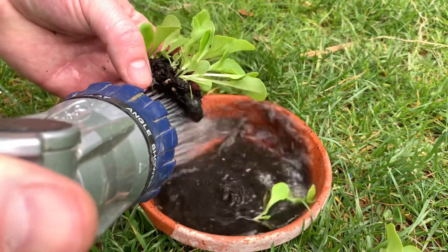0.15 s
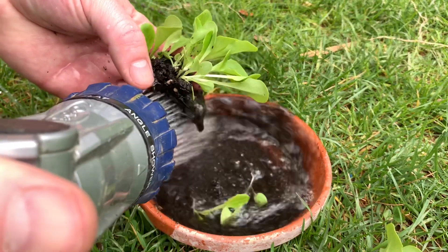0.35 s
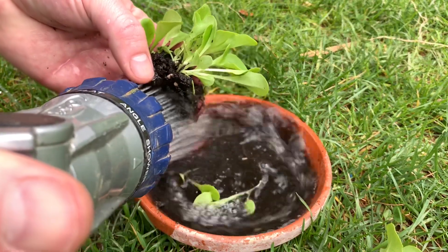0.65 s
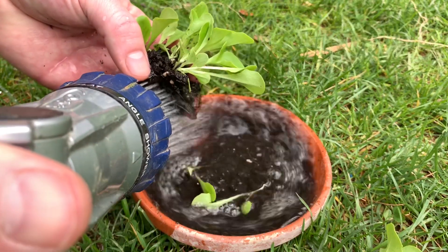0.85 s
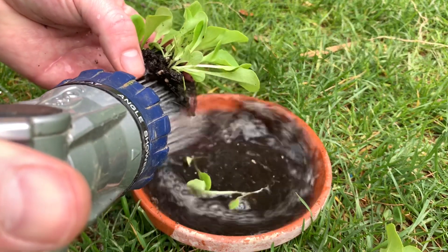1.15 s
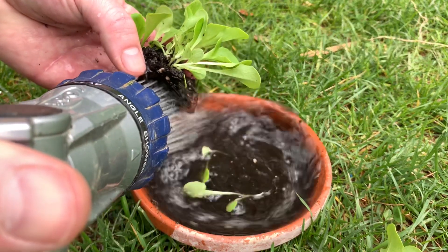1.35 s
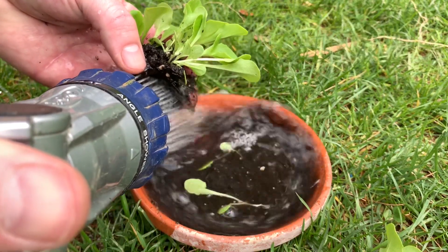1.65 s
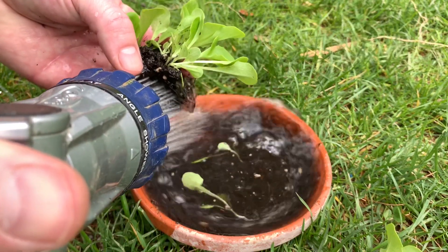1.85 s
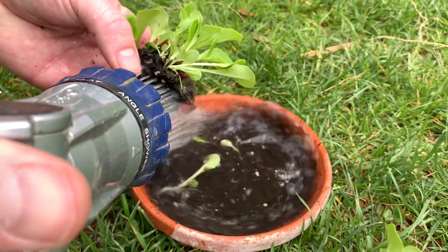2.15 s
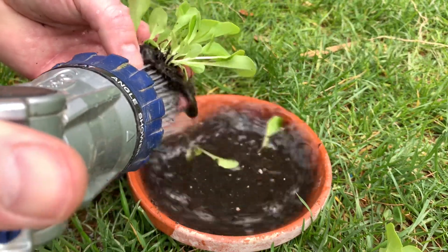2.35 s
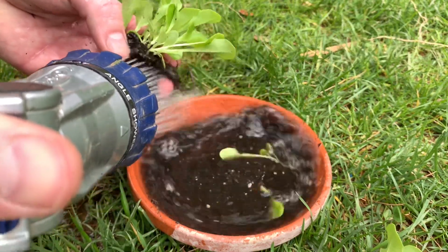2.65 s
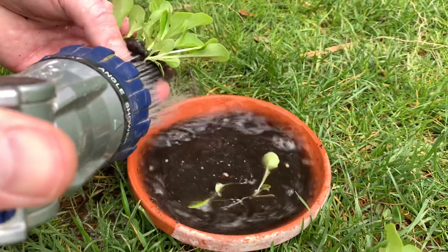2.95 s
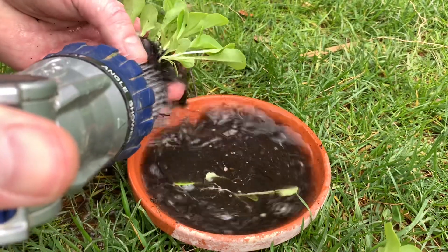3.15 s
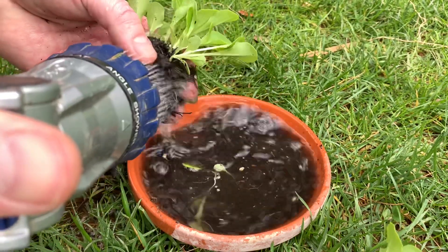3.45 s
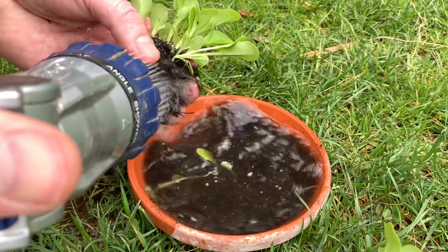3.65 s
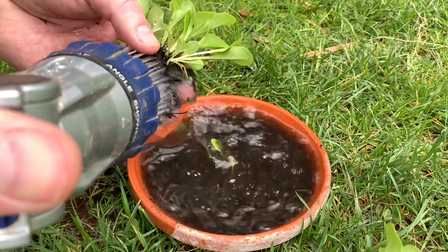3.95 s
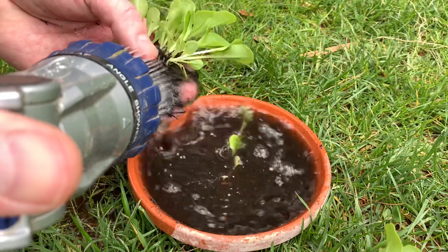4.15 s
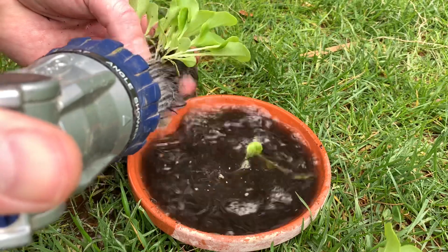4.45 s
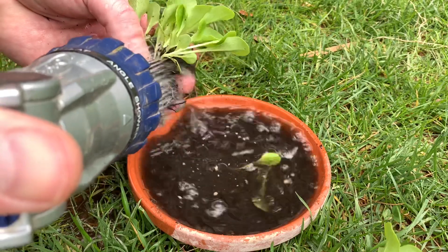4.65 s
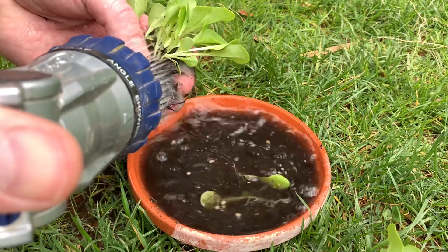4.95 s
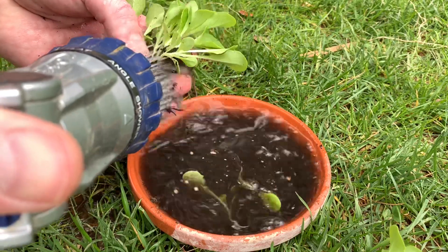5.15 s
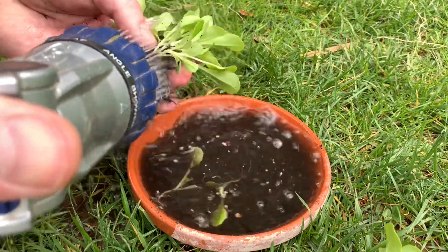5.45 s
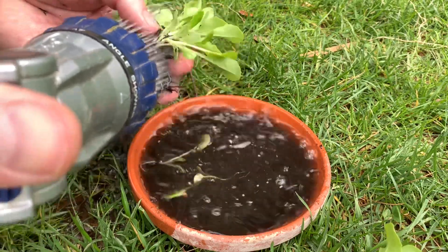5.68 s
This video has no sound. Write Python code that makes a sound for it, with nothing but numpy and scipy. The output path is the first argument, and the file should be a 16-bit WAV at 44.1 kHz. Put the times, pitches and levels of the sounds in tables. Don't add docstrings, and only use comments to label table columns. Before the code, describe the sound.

Close, airy water spray on plant roots with faint splashing and bubbling in a clay dish, under low, irregular wind buffeting outdoors.

```python
import sys
import numpy as np
from scipy import signal
from scipy.fft import rfft, irfft, next_fast_len
from scipy.io import wavfile
from scipy.ndimage import map_coordinates

SR = 44100
rng = np.random.default_rng(int(sys.argv[2]) if len(sys.argv) > 2 else 0)


def voltage_ratio(level):
    return 10 ** (np.asarray(level, float) / 20)


def materialize(psi):
    bounded = np.clip(np.atleast_2d(psi).T, -1, 1)
    quanta = np.round(bounded * 32767).astype(np.int16)
    wavfile.write(sys.argv[1], SR, quanta)


N = 256291

# time in seconds, jet hiss in dB, share of the jets caught by the roots in dB.
SPRAY = [(0, -32, 4.5), (.3, -30.5, 2.5), (.9, -30, 1), (1.8, -31.5, 2), (2.4, -31, 2.5), (3.35, -30, -1.5),
         (3.75, -29.5, -0.5), (4.3, -29.5, -1), (4.8, -29.5, -1), (5.4, -29.5, -0.5), (5.81, -30, -1)]
# frequency in Hz, density in dB per Hz, left-right difference in dB.
JET_COLOUR = [(3900, -30, -2), (4500, -15, -1.5), (5500, -16, -3), (6150, -12, -2), (6700, -4.5, -1.5),
              (7050, -6, 0), (7800, 0, 0), (9200, -4.5, 0), (10000, -4.5, 0), (11750, -8, 0),
              (12300, -2.5, 0), (13200, -8, 0), (14300, -9.5, 0), (15700, -13, 0)]
# centre in Hz, width in Hz, gain in dB.
JET_CAVITIES = [(8200, 196, -7), (8420, 230, 1.5), (9570, 720, -2), (14500, 320, -6)]
# frequency in Hz, lead of the right port in turns, likeness of the ports from 0 to 1.
PORT_PHASE = [(4000, .85, .3), (4700, 1.02, .35), (5500, 1.15, .25), (6100, 1.3, .55), (6600, 1.42, .7),
              (7200, 1.51, .95), (8200, 1.78, .75), (8900, 1.97, .98), (9750, 2.04, .98),
              (10400, 2.22, .75), (11000, 2.47, .99), (11900, 2.53, .99), (12600, 2.73, .75),
              (13250, 2.96, .99), (14800, 3.04, .98), (15250, 3.36, .82), (15700, 3.52, .93)]
# time in seconds, extra lag of the left port in samples.
AIM = [(0, 0.004), (1, -0.042), (2, -0.096), (3, -0.0031), (4, 0.019), (5, 0.052), (5.81, -0.018)]
# middle in seconds, half length in seconds, change on the roots in dB, change of fine scatter in dB.
TURNS = [
    (.62, .15, -0.1, -3),
    (1.267, 0.088, -2.5, -6.5),
    (3.54, 0.35, 1.1, -6.5),
    (4.305, 0.48, -0.4, -3.5),
]
# frequency in Hz, density in dB per Hz, left-right difference in dB,
# likeness of the ports from 0 to 1, phase lead of the right port in radians.
SPLASH_COLOUR = [(336, -22.5, 5.5, 0.5, 3.5), (610, -17.5, -2, 0.02, -1.5), (870, -20, 4, 0.39, 0.34),
                 (1600, -11.5, 3, .65, -3.7), (1800, -8, 5, .3, -4.5), (1990, -6.5, 1, .8, -3.2),
                 (2230, -4, .5, .84, -3.2), (2430, 0, 0, .7, -4.05), (2620, -3.5, -1.5, .35, -3.5),
                 (2760, -1.5, 3.5, .45, -3.8), (3120, -5.5, 0, .5, -3.3), (3400, -5.5, -.5, .77, -3.14),
                 (4050, -6, -2, .22, -3.3), (4760, -27.5, -18, 0.45, -2)]
# time in seconds, rumble in dB, flutter in dB.
WIND = [(0, -45.5, -53), (.5, -44.5, -45), (.9, -40.5, -50.5), (1.25, -45, -62), (1.55, -42, -49),
        (1.9, -41, -46.5), (2.2, -33, -50.5), (2.45, -42.5, -56), (2.75, -32.5, -39), (3.0, -35, -53),
        (3.3, -42, -47), (3.55, -34, -50), (3.85, -34.5, -44), (4.05, -40, -50), (4.3, -32, -50.5),
        (4.9, -37, -60), (5.45, -35, -43.5), (5.81, -37.5, -55)]
# frequency in Hz, density in dB per Hz.
RUMBLE_COLOUR = [(11, -45), (18, -22), (70, -1), (97, -2), (194, -15.5), (353, -29.5), (500, -36.5),
                 (650, -40.5), (1100, -120)]
# frequency in Hz, density in dB per Hz.
FLUTTER_COLOUR = [(70, -18), (150, 1.0), (250, -8.5), (400, -16.5), (650, -31.5)]
# time in seconds, level of the fundamental in dB.
MOTOR_LEVEL = [
    (0, -49),
    (1, -48.5),
    (2, -58),
    (3.5, -56.5),
    (5.81, -54),
]
# multiple of the fundamental, level in dB.
MOTOR_PARTIALS = [(1, -1.5), (2, -9), (3, -20)]
# start in seconds, peak in dB, pitch in Hz, level of the sharp edge in dB.
THUMPS = [(0.546, -29, 78.1, -62), (0.68, -28, 80, -27), (0.995, -29.5, 78, -12), (1.034, -24.5, 186, -16),
          (1.064, -24.5, 72, -11), (1.112, -17.5, 156, -18), (1.123, -18, 101, -14.5),
          (1.864, -29, 91.5, -15), (2.041, -16.5, 79, -15.5), (2.089, -26, 79, -10), (2.135, -34, 135, 0),
          (2.154, -22.5, 67.3, -18), (2.258, -25.5, 117, -17), (2.304, -28, 74, -18),
          (2.575, -21.5, 142, -21), (2.617, -19.5, 174, -23), (2.642, -14, 150, -20), (2.68, -26, 64.6, -9),
          (2.733, -19, 149, -35), (2.805, -22, 95, -18), (2.937, -19, 84, -37), (3.605, -20, 66.6, -26),
          (3.845, -25.5, 138, -30), (3.929, -35, 95.5, -4.5), (4.269, -26.5, 115, -16.5),
          (4.765, -16.5, 122, -10), (4.801, -28.5, 199, -9.5), (5.084, -25, 110, -34),
          (5.266, -25.5, 120, -31), (5.542, -22, 99, -17)]


def rms_one(x):
    return x / np.sqrt(np.mean(x ** 2) + 1e-20)


def in_time(rows):
    s, *columns = np.transpose(rows)
    return [np.interp(np.arange(N) / SR, s, column) for column in columns]


def in_pitch(rows, hz):
    at, *columns = np.transpose(rows)
    return [np.interp(np.log(hz), np.log(at), column) for column in columns]


def spectrum_hz():
    size = next_fast_len(N)
    return np.maximum(np.arange(size // 2 + 1) * SR / size, 1)


def drift(rate):
    r = np.exp(-80 * np.pi * rate / SR)
    noise = rng.standard_normal(N // 40 + 2002)
    slow = rms_one(signal.lfilter([1], [1, -2 * r, r * r], noise)[2000:])
    return np.interp(np.arange(N) / 40, np.arange(len(slow)), slow)


def drops(per_s, spread_db):
    sizes_db = spread_db * np.minimum(rng.exponential(1, (3, N)), 5)
    sizes = voltage_ratio(sizes_db) * rng.choice([-1, 1], (3, N))
    return sizes * (rng.random((3, N)) < per_s / SR)


def at_ports(showers, level_db, pan_db, alike, lead, edges, patchy_db, lower_db=0):
    size = next_fast_len(N)
    hz = np.arange(size // 2 + 1) * SR / size
    both, left, right = rfft(showers, size)
    alike = np.clip(alike, 0, 1)
    shared, apart = np.sqrt(alike) * both, np.sqrt(1 - alike)
    left = voltage_ratio(level_db + pan_db / 2) * (shared + apart * left)
    right = voltage_ratio(level_db - pan_db / 2) * (shared * np.exp(1j * lead) + apart * right)
    inside = (hz > edges[0]) & (hz < edges[-1])
    out, together = 0, drift(4.5) + drift(13)
    for k in range(len(edges)):
        share = np.interp(hz, edges, np.arange(len(edges)) == k) * inside
        flicker_db = patchy_db * (0.5 * together + 0.67 * drift(1.3) + drift(13.3))
        swell_db = lower_db * (k <= len(edges) // 2)
        band = irfft(np.array([left, right]) * share, size)[:, :N]
        out = out + voltage_ratio(flicker_db + swell_db) * band
    return rms_one(out)


def turned():
    middle, half, *changes_db = np.transpose(TURNS)
    bells = np.exp(-((np.arange(N) / SR - middle[:, None]) / half[:, None]) ** 2)
    return np.array(changes_db) @ bells


def moved(pair):
    lag = in_time(AIM)[0] + .06 * drift(6)
    return np.array([map_coordinates(port, [np.arange(N) - side * lag / 2], order=3, mode="nearest")
                     for port, side in zip(pair, [1, -1])])


def jets(hiss_db, roots_db):
    hz = spectrum_hz()
    level_db, pan_db = in_pitch(JET_COLOUR, hz)
    turns, alike = in_pitch(PORT_PHASE, hz)
    for centre, width, gain_db in JET_CAVITIES:
        level_db = level_db + gain_db / (1 + (2 * (hz - centre) / width) ** 2)
    mist = drops(26000, spread_db=2.5)
    stray_db = -1.5 + 0.34 * np.arange(N) / SR + .6 * turned()[0]
    mist[1:] *= voltage_ratio(stray_db + 0.61 * drift(8.2))
    hiss = at_ports(mist, level_db, pan_db, alike, 2 * np.pi * turns,
                    np.geomspace(3700, 15760, 8), patchy_db=0.71, lower_db=roots_db)
    return voltage_ratio(hiss_db + 5.5) * moved(hiss)


def bubbles(per_s, cycles):
    born = drops(per_s, spread_db=5.5)
    dealt = rng.integers(0, 10, N)
    out = 0
    for k, pitch_hz in enumerate(np.geomspace(900, 4200, 10)):
        r, w = voltage_ratio(-60 * pitch_hz / cycles / SR), 2 * np.pi * pitch_hz / SR
        struck = born * (dealt == k) + 1e-18
        ring = signal.lfilter([1, 0, -1], [1, -2 * r * np.cos(w), r * r], struck)
        out = out + np.sqrt(1 - r) * ring
    return rms_one(out)


def splash(splash_db, fine_db):
    level_db, pan_db, alike, lead = in_pitch(SPLASH_COLOUR, spectrum_hz())
    t = np.arange(N) / SR
    deep_db = 3 - 1.14 * t
    gurgle_db = -2.5 + 0.41 * t
    water = rms_one(drops(9000, spread_db=2.5)) + voltage_ratio(-16.5) * bubbles(500, cycles=25)
    deep = signal.sosfiltfilt(signal.butter(4, 2700, fs=SR, output="sos"), water[1:])
    fine = water[1:] - deep
    water[1:] = voltage_ratio(deep_db) * deep + voltage_ratio(0.6 * fine_db - 0.4) * fine
    patter = at_ports(water, level_db, pan_db, alike, lead,
                      np.geomspace(300, 5200, 8), patchy_db=.5, lower_db=gurgle_db)
    return voltage_ratio(splash_db + 6.0) * patter


def swells():
    rise_s, fall_s = 0.017, 0.06
    thumps_at, peaks_db = np.array(THUMPS)[:, :1], np.array(THUMPS)[:, 1]
    late = np.arange(N) / SR - thumps_at
    shape = np.exp(-2 * np.maximum(-late / rise_s, late / fall_s))
    return np.sqrt(voltage_ratio(2 * peaks_db) @ shape)


def wind():
    rumble_db, flutter_db = in_time(WIND)
    hz = spectrum_hz()
    rumble_colour_db, = in_pitch(RUMBLE_COLOUR, hz)
    rumble = at_ports(rng.standard_normal((3, N)), rumble_colour_db, 0, 0.55, 0,
                      np.geomspace(27, 600, 4), patchy_db=1.5)
    flutter_colour_db, = in_pitch(FLUTTER_COLOUR, hz)
    flutter = at_ports(rng.standard_normal((3, N)), flutter_colour_db, 0, 0.48, 0,
                       np.geomspace(50, 700, 4), patchy_db=3.5)
    swell = swells()
    lumps_db = 2.5 * drift(4.8)
    rumble_level = np.hypot(voltage_ratio(rumble_db + lumps_db), voltage_ratio(-14) * swell)
    flutter_level = np.hypot(voltage_ratio(flutter_db - 2.5), voltage_ratio(-28.5) * swell)
    return rumble_level * rumble + flutter_level * flutter


def motor():
    fundamental_hz = 101.9 * (1 + 0.01224 * drift(2.67))
    phase = 2 * np.pi * np.cumsum(fundamental_hz) / SR
    hum = 0
    for multiple, level_db in MOTOR_PARTIALS:
        hum = hum + voltage_ratio(level_db + 3.2 * drift(2.9)) * np.sin(multiple * phase)
    return voltage_ratio(in_time(MOTOR_LEVEL)[0] + 6) * hum


def thumps():
    out = np.zeros((2, N + SR))
    for s, peak_db, pitch_hz, edge_db in THUMPS:
        toss, side = rng.standard_normal(2)
        sign, pan_db = np.sign(toss), 3 * side
        t = np.arange(round(4 * SR / pitch_hz)) / SR
        turns = t * pitch_hz
        swing = (turns / 0.75) ** 2 * np.exp(2 - 2 * turns / 0.66)
        swing = swing * np.sin(2 * np.pi * 1.27 * turns ** 0.79)
        edge = (t / 0.0035) ** 3 * np.exp(3 - 3 * t / 0.0036)
        edge = edge * np.sin(2 * np.pi * 1.206 * (t / 0.00362) ** 0.78)
        at = round(s * SR)
        ports_db = peak_db + np.array([[.5], [-.5]]) * pan_db
        out[:, at:at + len(t)] += sign * voltage_ratio(ports_db) * (swing + voltage_ratio(edge_db + 5.0) * edge)
    return out[:, :N]


def scene():
    hiss_db, roots_db = in_time(SPRAY)
    roots_change_db, fine_change_db = turned()
    spray = jets(hiss_db, roots_db + roots_change_db)
    splash_db = -41.5 + 0.32 * (hiss_db - hiss_db.mean())
    dish = splash(splash_db, 2 + fine_change_db)
    return spray + dish + wind() + motor() + thumps()


def low_pass(x):
    return signal.sosfilt(signal.butter(12, 15840, fs=SR, output="sos"), x)


def record(dry):
    return low_pass(dry)


dry = scene()
out = record(dry)
materialize(out)
```